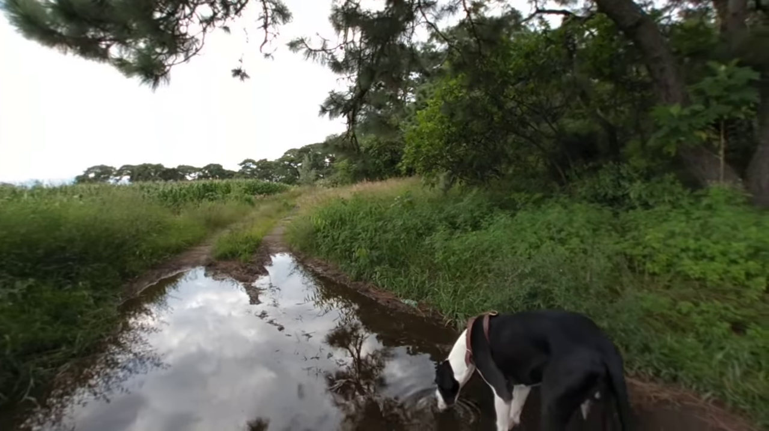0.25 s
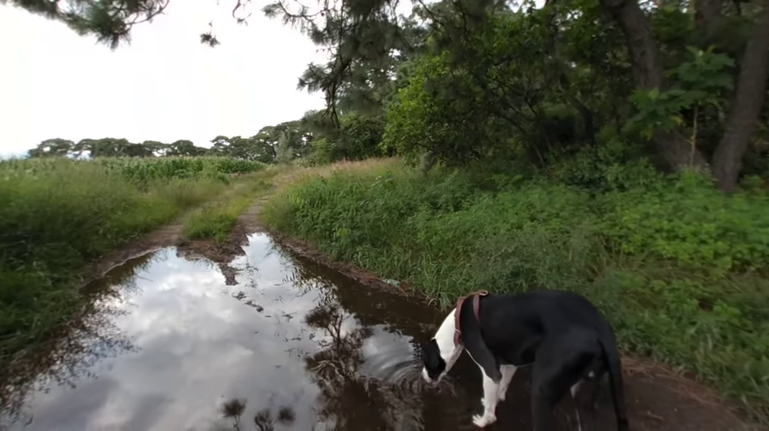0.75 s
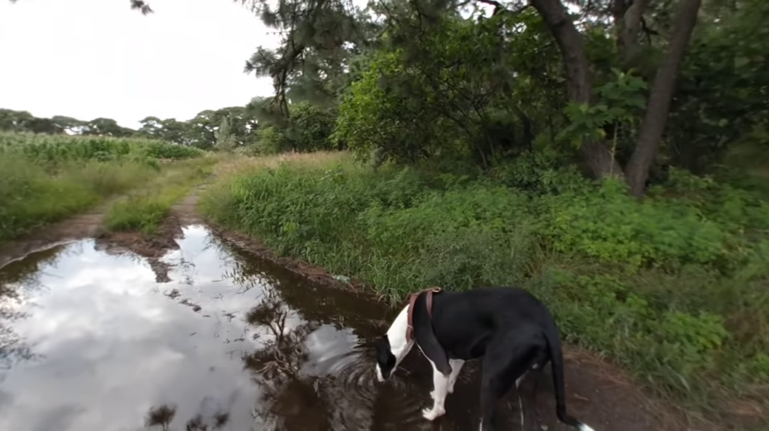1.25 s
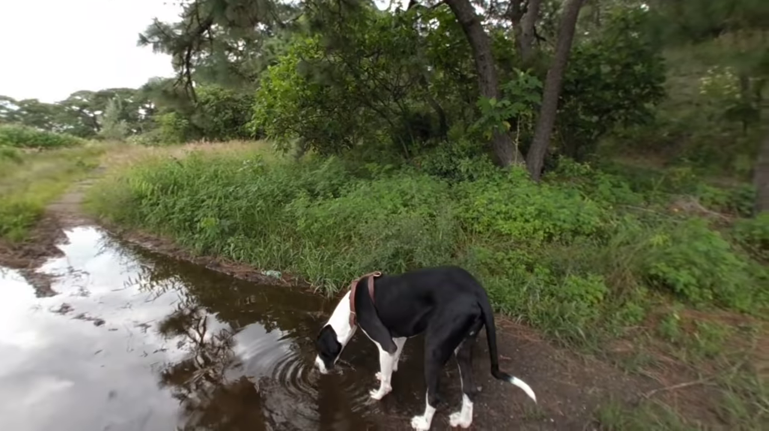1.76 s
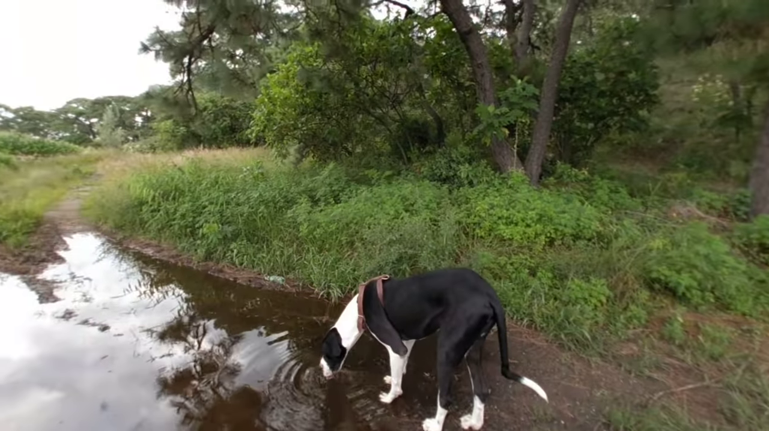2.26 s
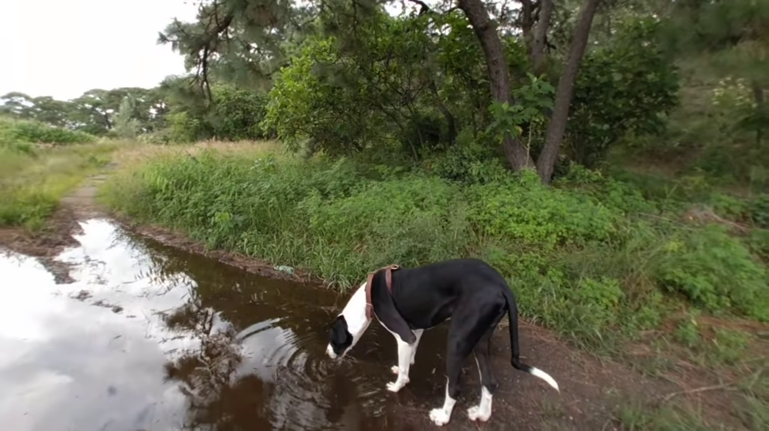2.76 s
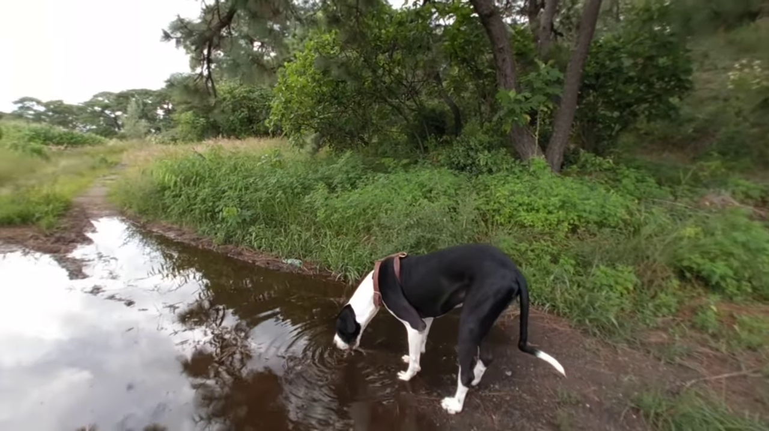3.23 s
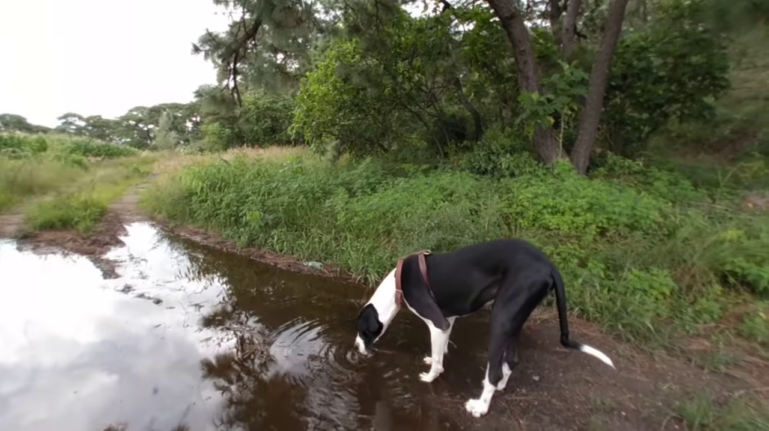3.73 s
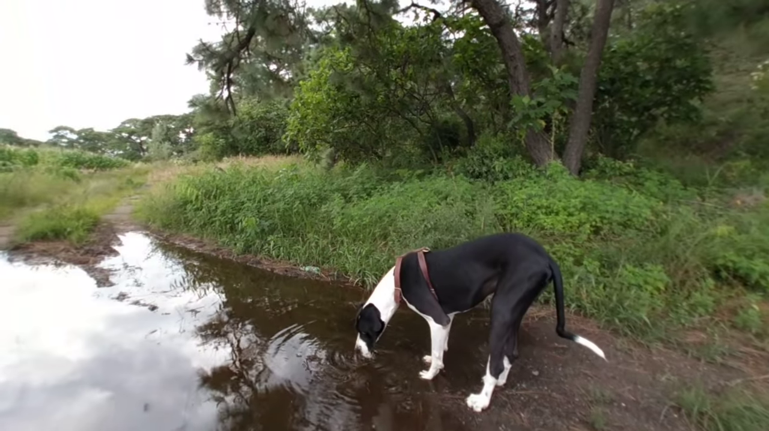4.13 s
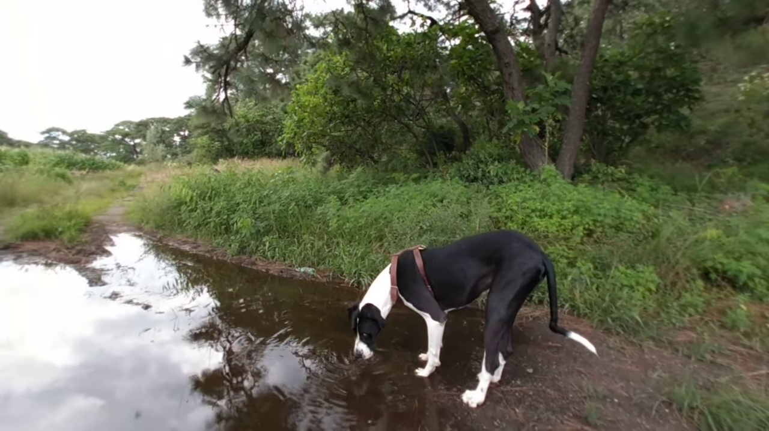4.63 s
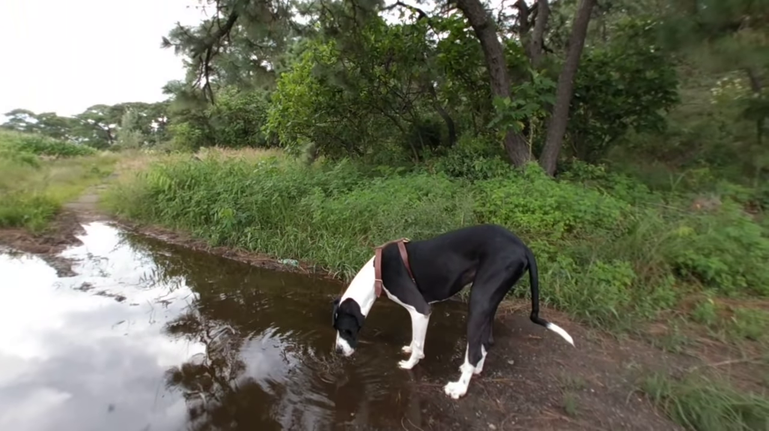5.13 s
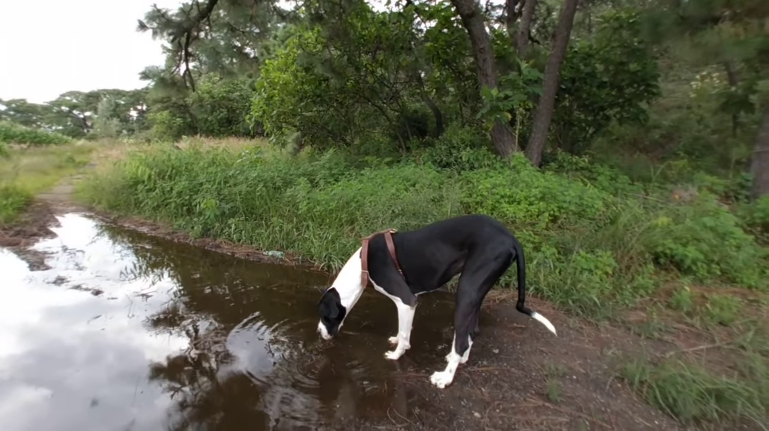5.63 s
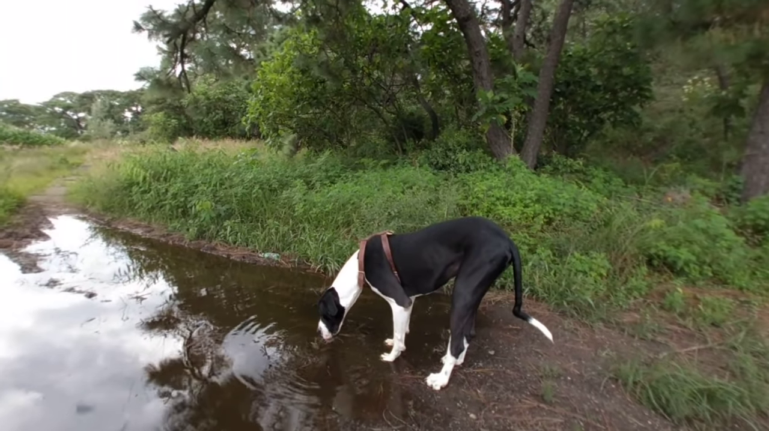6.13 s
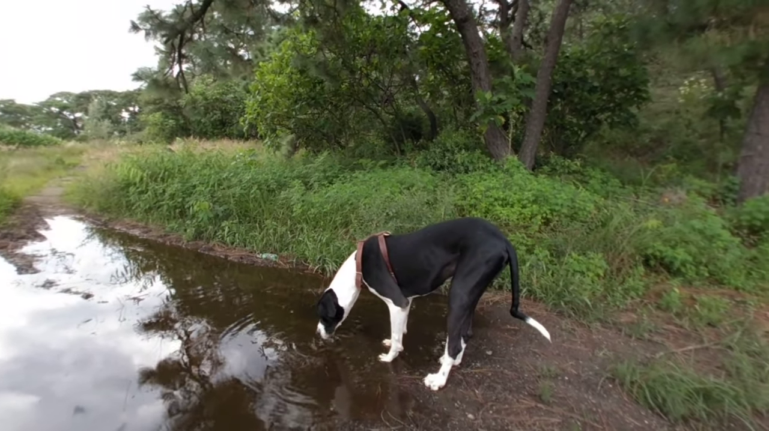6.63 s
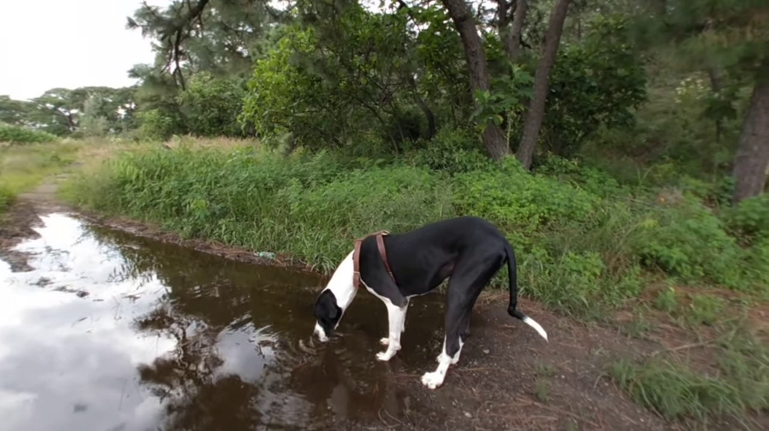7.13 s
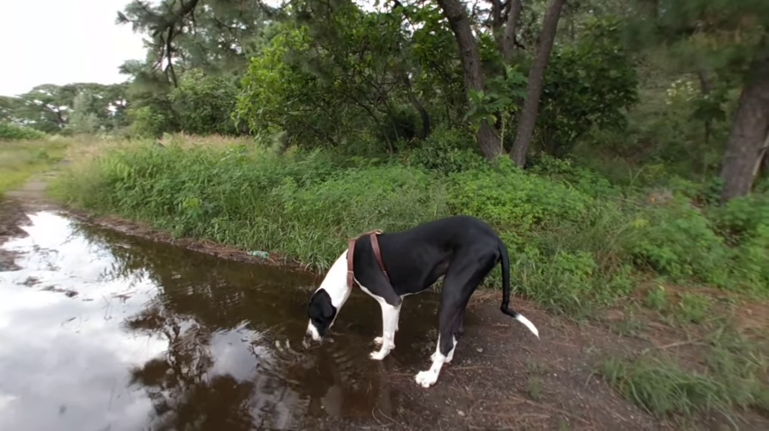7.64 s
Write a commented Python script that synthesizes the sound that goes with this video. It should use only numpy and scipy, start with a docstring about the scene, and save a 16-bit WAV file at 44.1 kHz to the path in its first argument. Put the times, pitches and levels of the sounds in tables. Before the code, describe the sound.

A dog's tongue slaps and stirs shallow water: smack, plop, gurgle, then small blips and crisp drips. The laps start sparse, grow strongest around two to three seconds, and continue in steady uneven bursts until the end. Faint bright rustling, as of clothing or grass, comes and goes over a soft low outdoor murmur with slight wind buffeting. Close, clean stereo pickup with almost no echo, only faint scatter from bank and bushes.

```python
"""A dog laps from a rain puddle on a dirt track: air pockets plop as damped resonators under its tongue,
wet surfaces smack and squelch by exciting small cavities, and bubbles, blips and drops ring at their own pitch.
The stirring of each lap drives a bubbly slurp and a fine spray of clicks. Around it lie a soft rustle, as of
clothing or grass, a low outdoor murmur with a gurgle in it, and gusts, all three made from shaped noise.
Faint scatter, a scattering recorder body, a wind filter, noise suppression and a band limit shape the whole."""
import sys
import numpy as np
from scipy import signal
from scipy.fft import rfft, irfft
from scipy.io import wavfile
from scipy.ndimage import uniform_filter1d

SR = 44100
rng = np.random.default_rng(int(sys.argv[2]) if len(sys.argv) > 2 else 0)


def transcribe(signal):
    """Save signal, clipped to [-1, 1], as a 16-bit WAV file at the path in sys.argv[1]."""
    frames = np.atleast_2d(signal).T
    limited = np.clip(frames, -1, 1)
    pcm = np.round(limited * 32767).astype(np.int16)
    wavfile.write(sys.argv[1], SR, pcm)


N = 347508
TIME = np.arange(N) / SR  # seconds
BRIEF = TIME[:3000]  # time axis of a single short event
EDGE_HZ = 16100  # upper band limit

# Levels in the tables are nominal: each layer may trim them. Pitches are nominal: most events bend around them.
# Air pockets that the tongue closes in the water. Each row: start in seconds, level in dB, pitch in Hz.
AIR_POCKETS = [(0.6614, -28.5, 220), (1.026, -43.5, 189), (1.399, -42, 159), (1.867, -46, 510),
               (2.2314, -36, 602), (2.293, -25.5, 188), (2.3579, -35, 431), (2.5518, -35, 470),
               (2.6673, -25.5, 182), (2.834, -41.5, 259), (2.9486, -26.5, 490), (3.054, -30, 182),
               (3.594, -42, 477), (3.851, -39, 430), (3.957, -39.5, 203), (3.975, -41, 406),
               (4.073, -41.5, 276), (4.117, -41.5, 480), (4.221, -40, 478), (4.333, -38.5, 280),
               (4.657, -43.5, 436), (4.7437, -32, 194), (4.789, -37.5, 266), (5.052, -40, 480),
               (5.069, -39, 361), (5.179, -36.5, 188), (5.238, -35.5, 506), (5.395, -39.5, 305),
               (5.653, -40.5, 430), (5.674, -38, 322), (5.929, -39, 335), (6.052, -42.5, 420),
               (6.198, -39.5, 511), (6.508, -42.5, 445), (6.583, -42.5, 460), (6.786, -37.5, 474),
               (6.805, -44, 465), (6.894, -39, 166), (7.279, -32.5, 183.6), (7.703, -41.5, 446)]
# Wet smacks of tongue and lips. Each row: start in seconds, level in dB, cavity pitch in Hz, overtone level in dB.
WET_SMACKS = [(0.3428, -36, 1020, -43), (0.4796, -31.5, 1420, -43), (0.484, -39, 850, -30),
              (0.573, -34.5, 1460, -55), (0.6061, -32, 697, -41), (0.9733, -32, 730, -28.5),
              (1.0825, -30.5, 715, -45), (1.459, -38.5, 776, -35), (1.9865, -39.5, 615, -40.5),
              (2.2, -52, 1220, -33), (2.2329, -31, 615, -38), (2.354, -50, 835, -30.5),
              (2.363, -29.5, 1350, -61), (2.3725, -34.5, 900, -37), (2.545, -40.5, 1030, -40.5),
              (3.0548, -32, 600, -46), (3.1112, -29, 1400, -46), (3.136, -36, 1090, -20),
              (4.018, -30, 900, -36), (4.054, -38.5, 925, -44), (4.2213, -58, 1094, -29),
              (4.393, -36.5, 920, -46), (4.4, -37, 1270, -56), (4.809, -34.5, 620, -47),
              (5.0544, -42.5, 620, -50), (5.679, -43, 1015, -43), (5.8322, -30, 1280, -63),
              (5.8378, -30, 870, -56), (5.932, -34.5, 845, -36), (6.0628, -36, 1650, -52.5),
              (6.2108, -46, 1090, -34.5), (6.5858, -35, 824, -35.5), (6.598, -39.5, 1160, -33),
              (6.953, -30.5, 864, -34), (6.9678, -31, 1350, -39.5), (7.1948, -38, 1110, -30),
              (7.3478, -30, 812, -36)]
# Loudest drops and bursting films. Each row: start in seconds, level in dB, pitch in Hz.
LOUD_DROPS = [(0.5727, -41, 14900), (0.6123, -40.5, 3300), (0.941, -36, 5730), (1.041, -39, 14400),
              (1.3496, -40, 3610), (2.199, -40, 5630), (2.756, -43, 14600), (2.834, -44.5, 12800),
              (3.0208, -40, 6770), (3.1117, -38, 3850), (3.168, -44, 3424), (3.9022, -38.5, 4500),
              (4.053, -32.5, 13000), (4.2996, -39.5, 7400), (4.716, -36, 14200), (4.7964, -37, 12000),
              (4.862, -44.5, 13500), (4.969, -50.5, 8450), (5.079, -44, 4700), (5.373, -42.5, 14000),
              (5.386, -43, 3200), (5.837, -43, 7160), (5.8845, -47.5, 8400), (5.9316, -52, 3950),
              (6.063, -47, 13300), (6.164, -50, 7260), (6.445, -45.5, 7700), (6.6003, -45, 3424),
              (6.8205, -44.5, 5570), (7.228, -42, 3800), (7.2391, -40.5, 6400), (7.324, -41, 6950),
              (7.7038, -46.5, 6850), (7.751, -45, 3940)]
# Single round bubbles that blip at the surface. Each row: start in seconds, level in dB, pitch in Hz.
SURFACE_BUBBLES = [(0.129, -50.5, 1760), (0.138, -51.5, 2760), (0.245, -47.5, 2410), (0.409, -56, 1420),
                   (0.939, -47, 1470), (0.962, -42.5, 1820), (1.279, -46, 1970), (1.829, -49, 2120),
                   (1.869, -48.5, 2360), (1.957, -52, 1620), (1.992, -38.5, 1020), (2.077, -41, 1340),
                   (2.176, -51, 2580), (2.24, -41.5, 1600), (2.449, -47, 1610), (2.7342, -39, 1315),
                   (2.746, -51, 2400), (3.65, -46, 2390), (3.666, -34.5, 2360), (4.034, -45.5, 2000),
                   (4.282, -45.5, 1470), (4.289, -41.5, 2480), (4.623, -48.5, 2370), (4.639, -44, 2080),
                   (4.794, -47, 1300), (4.862, -45.5, 2020), (4.871, -46.5, 2390), (5.13, -44.5, 1610),
                   (5.1398, -44, 2550), (5.221, -48, 1870), (6.284, -53, 2080), (6.659, -42, 1960),
                   (7.109, -52, 3025), (7.729, -51, 2560), (7.867, -47.5, 1680)]
# Water squeezed between tongue and palate, through a cavity that changes size. Each row: start in seconds,
# length in seconds, level in dB, first pitch in Hz, last pitch in Hz, overtone level in dB.
SQUEEZES = [(0.33, 0.021, -44.5, 1005, 800, -47.5), (0.883, 0.055, -46, 608, 447, -63),
            (1.06, 0.029, -51, 608, 915, -45.5), (1.082, 0.018, -44, 847, 1156, -47),
            (1.417, 0.027, -45.5, 406, 830, -68), (3.621, 0.061, -48, 730, 991, -75),
            (5.645, 0.0385, -56, 795, 1030, -65), (5.831, 0.013, -35, 1578, 1120, -80),
            (6.195, 0.017, -47.5, 583, 1150, -57), (7.313, 0.031, -43, 758, 1300, -43.5)]
# Laps, in which the tongue stirs the water. Each row: start in seconds, length in seconds, strength in dB.
TONGUE_LAPS = [(0.109, 0.17, -63), (0.318, 0.097, -57), (0.705, 0.0067, -44.5), (0.882, 0.23, -57),
               (1.144, 0.32, -57), (1.348, 0.16, -56), (1.816, 0.09, -57), (1.974, 0.12, -56.5),
               (2.172, 0.33, -53.5), (2.547, 0.075, -55), (2.714, 0.034, -49), (2.945, 0.24, -57),
               (3.473, 0.019, -47.5), (3.63, 0.3, -55), (3.843, 0.25, -54.5), (4.384, 0.046, -53),
               (4.625, 0.26, -56.5), (5.066, 0.051, -55.5), (5.221, 0.053, -53.5), (5.456, 0.012, -58),
               (5.645, 0.073, -55.5), (6.055, 0.009, -55.5), (6.272, 0.083, -66.5), (6.424, 0.29, -56),
               (6.785, 0.33, -58.5), (7.16, 0.2, -58), (7.661, 0.077, -57)]
# Gusts over the microphone ports. Each row: time of the peak in seconds, level in dB.
WIND_GUSTS = [(0.69, -46.5), (2.368, -39), (2.85, -50)]
# Loudness of the rustle. Each row: time in seconds, level in dB.
RUSTLE_LEVEL = [(0.13, -79), (0.24, -58.5), (0.87, -72), (1.02, -59.5), (1.48, -55), (1.78, -78.5),
                (2.2, -61.5), (2.5, -80), (2.6, -60), (2.92, -72.5), (3.17, -50.5), (3.55, -63.5),
                (3.92, -54), (4.15, -60.5), (4.6, -60), (5.28, -66.5), (5.34, -87), (5.39, -66),
                (5.54, -72), (6.35, -78.5), (6.97, -71), (7.12, -85), (7.34, -61), (7.42, -84)]
# Loudness of the low murmur. Each row: time in seconds, level in dB.
MURMUR_LEVEL = [(0, -56), (0.1, -78.5), (0.33, -57.5), (0.55, -64), (0.88, -57), (1.76, -60.5), (1.85, -55),
                (4.8, -54.5), (5.34, -54.5), (5.65, -53.5), (6.9, -53.5), (7.1, -61), (7.3, -50.5),
                (7.47, -66), (7.58, -56.5)]
# Spectral shapes of the five noise-like layers. Each row: frequency in Hz, relative spectral level in dB.
BUBBLE_SPECTRUM = [(250, -6), (480, 7), (750, -1), (1050, -4), (1400, -2), (2400, -6.5), (3100, -16.5),
                   (6000, -16.5), (10000, -30)]
SPRAY_SPECTRUM = [(1200, -10.5), (3000, -9.5), (10000, -22), (15500, -34)]
RUSTLE_SPECTRUM = [(500, 0.5), (1500, 11), (3000, 8.5), (6000, 6.5), (9000, 5.5), (12500, 8.5), (15500, 10)]
MURMUR_SPECTRUM = [(45, -16.5), (80, 5), (160, 6.5), (270, 0), (350, -5), (470, -0.5), (600, -9),
                   (900, -55), (1500, -61.5)]
BREEZE_SPECTRUM = [(30, -52), (70, -1), (200, -13.5), (600, -47)]
# Level under which the recorder takes sound for noise. Each row: frequency in Hz, level in dB per bin.
QUIET_LEVEL = [(100, -71.5), (450, -75), (1000, -103.5), (2000, -106), (5000, -99), (14000, -99)]

# the water is churned up fast, eases while the tongue works, and settles after it
CHURN_DB_PER_S, EASE_DB_PER_S, SETTLE_DB_PER_S = 910, 24.5, 390
RIPPLE_DB, RIPPLE_DB_PER_S = -12.5, 87  # ripples linger after a lap, relative to its strength
FROTH_DB, FROTH_DB_PER_S = -17.5, 649  # each smack leaves a brief froth, relative to its level
STILL_DB, HARDEST_DB = -81.5, -52  # stirring left in the pauses; the stirring never rises above a fixed ceiling
SWELL_S = 0.0044  # time an air pocket takes to reach its peak
GUST_DB_PER_S, CALM_DB = 165, -66.5  # how fast a gust comes and goes; the air between gusts


def gain_of(db):
    """Logarithmic level: decibels become an amplitude factor."""
    return 10 ** (np.asarray(db) / 20)


def evened(x):
    """Normalization of power: scales a signal to an rms of 1."""
    return x / np.sqrt(np.mean(x ** 2) + 1e-20)


def read_spectrum(points, hz):
    """Interpolation of a spectrum, linear in dB over log frequency."""
    f, value = np.transpose(points)
    return np.interp(np.log(hz + 1), np.log(f + 1), value)


def follow(curve):
    """Linear interpolation of a level curve at every sample."""
    return np.interp(TIME, *np.transpose(curve))


def add(mix, s, sound):
    """Superposition: adds a sound to the mix from time s onward."""
    part = mix[max(round(s * SR), 0):][:len(sound)]
    part += sound[:len(part)]


def coloured(x, colour):
    """Spectral shaping: weights each frequency, then scales to an rms of 1."""
    weights = gain_of(read_spectrum(colour, np.fft.rfftfreq(N, 1 / SR)))
    return evened(irfft(rfft(x) * weights, N))


def wander(count):
    """Slow random modulation: noise smoothed twice over count samples, at an rms of 1."""
    smooth = uniform_filter1d(rng.standard_normal(N), count)
    return evened(uniform_filter1d(smooth, count))


def clicks(per_s, spread_db):
    """Random impulses of either sign: most are small and a few large."""
    size = gain_of(spread_db * np.minimum(rng.exponential(1, N), 3.5))
    sign = rng.choice([-1, 1], N)
    return size * sign * (rng.random(N) < per_s / SR)


def ring(hz, cycles):
    """Damped resonance: a cavity decays by 1/e in some cycles, its pitch rising as it shrinks."""
    age = BRIEF * hz / cycles
    turns = np.cumsum(hz * (1 + .03 * np.tanh((age - 1) / 2))) / SR
    return np.exp(-age) * np.sin(2 * np.pi * turns)


def snap(decay):
    """Broadband transient: the short crack of wet surfaces that meet or part."""
    band = signal.butter(1, [700, 3200], "band", fs=SR)
    burst = signal.lfilter(*band, rng.standard_normal(len(BRIEF)))
    return evened(burst) * np.exp(-BRIEF / decay)


def crackle(length, per_s):
    """Decaying impulse train: a few small clicks as a water film tears."""
    lot, size = rng.random(len(BRIEF)), rng.standard_normal(len(BRIEF))
    return (lot < per_s / SR) * size * np.exp(-BRIEF / length)


def wavering(t, hz, rough, count=60):
    """Frequency modulation: a unit tone whose pitch wavers as its cavity trembles."""
    tremble = evened(uniform_filter1d(rng.standard_normal(len(BRIEF)), count))[:len(t)]
    return np.sin(2 * np.pi * np.cumsum(hz * (1 + rough * tremble)) / SR)


def swell(start, length, db, rise, sag, fall):
    """Exponential power envelope: attack, sagging hold and release, each in dB per second."""
    age = TIME - start
    before, after = np.maximum(-age, 0), np.maximum(age - length, 0)
    drop = rise * before + sag * np.clip(age, 0, length) + fall * after
    return gain_of(db - np.minimum(drop, 100)) ** 2


def swarm(births, low_hz, high_hz):
    """Superposed bubble resonances of many sizes: some ring on while others soon die."""
    out = np.zeros(N)
    pitch = low_hz * (high_hz / low_hz) ** rng.random(N)
    cycles = 2 * 4 ** rng.random(N)
    for at in np.flatnonzero(births):
        onset = 1 - np.exp(-BRIEF * pitch[at])  # swells within about a cycle
        bubble = ring(pitch[at], cycles[at]) * onset
        add(out, at / SR, births[at] * pitch[at] / np.sqrt(cycles[at]) * bubble)
    return out


def stirring():
    """Addition of powers, in dB: laps churn the water and leave ripples, and smacks add froth."""
    power = np.full(N, gain_of(STILL_DB) ** 2)
    for start, length, db in TONGUE_LAPS:
        power += swell(start, length, db, CHURN_DB_PER_S, EASE_DB_PER_S, SETTLE_DB_PER_S)
        power += swell(start, length, db + RIPPLE_DB, CHURN_DB_PER_S, EASE_DB_PER_S, RIPPLE_DB_PER_S)
    for s, db, _, overtone_db in WET_SMACKS:
        froth_db = max(db, overtone_db) + FROTH_DB - FROTH_DB_PER_S * BRIEF
        add(power, s, gain_of(froth_db) ** 2)
    return np.minimum(10 * np.log10(power), HARDEST_DB)


def murmur(level_db=-1, swell_db=2.0, slosh_db=-6):
    """Shaped noise: low outdoor air, with low bubble resonances as the gurgle of the rocking puddle."""
    noise = coloured(rng.standard_normal(N), MURMUR_SPECTRUM)
    air = noise * gain_of(level_db + swell_db * wander(count=1800))
    slosh = evened(swarm(clicks(per_s=35, spread_db=0.0), 135.7, 498.0))
    return (air + gain_of(slosh_db) * slosh) * gain_of(follow(MURMUR_LEVEL))


def breeze(level_db=1):
    """Incoherent turbulence: moving air buffets each microphone port on its own."""
    power = gain_of(CALM_DB) ** 2
    for s, db in WIND_GUSTS:
        power = power + swell(s, 0, db, GUST_DB_PER_S, 0, GUST_DB_PER_S)
    noise = coloured(rng.standard_normal((2, N)), BREEZE_SPECTRUM)
    return noise * gain_of(level_db) * np.sqrt(power)


def rustle(level_db=1, flutter_db=3.0):
    """Friction noise: a fine, bright rubbing hiss, independent in each channel."""
    hiss = coloured(rng.standard_normal((2, N)), RUSTLE_SPECTRUM)
    return hiss * gain_of(follow(RUSTLE_LEVEL) + level_db + flutter_db * wander(count=900))


def bubbles(level_db=-0.5, spread_db=3.5):
    """Density of resonators: gentle stirring frees sparse bubbles, hard stirring packs a ragged slurp."""
    stir = stirring()
    per_s = 900 * gain_of(stir - stir.max()) + 220
    births = clicks(per_s, spread_db) / np.sqrt(per_s)  # evens out power as the density changes
    chatter = coloured(evened(swarm(births, 420, 3400)), BUBBLE_SPECTRUM)
    # bubbles too small to tell apart fuse into a wash between the others
    wash = coloured(rng.standard_normal(N), BUBBLE_SPECTRUM)
    clumps_db = 3 * wander(count=350)
    return evened(chatter + .55 * wash) * gain_of(stir + level_db + clumps_db)


def spray(level_db=-11.0, per_s=330, spread_db=5, clump_db=3, steepness=1.36):
    """Nonlinear drive: the finest droplets tick in clumps, rising more steeply than the stirring."""
    fizz = clicks(per_s, spread_db) * gain_of(clump_db * wander(count=500))
    stir = stirring()
    drive = stir.mean() + steepness * (stir - stir.mean())
    mist = evened(swarm(fizz, 3000, 14000)) + evened(fizz)
    return coloured(mist, SPRAY_SPECTRUM) * gain_of(drive + level_db)


def blips(level_db=0, swell_s=.0018, bend=.03, rough=.025, snap_db=-13):
    """Bubble resonance: a film snaps at the surface, and the tone swells and bends upward in pitch."""
    out, age = np.zeros(N), BRIEF / swell_s
    for s, db, hz in SURFACE_BUBBLES:
        pitch = hz * (1 + bend * np.tanh((age - 2) / 2))
        tone = age * np.exp(1 - age) * wavering(BRIEF, pitch, rough)
        add(out, s, gain_of(db + level_db) * (tone + gain_of(snap_db) * snap(decay=2 * swell_s)))
    return out


def squelches(level_db=-1, overtone=2.15, rough=0.14, overtone_rough=0.1):
    """Sustained cavity resonance: squeezed water sounds two modes that glide as the tongue moves."""
    out = np.zeros(N)
    for s, length, db, first_hz, last_hz, overtone_db in SQUEEZES:
        t = BRIEF[BRIEF < length]
        hz = first_hz * (last_hz / first_hz) ** (t / length)
        tone = gain_of(db) * wavering(t, hz, rough)
        tone = tone + gain_of(overtone_db) * wavering(t, hz * overtone, overtone_rough)
        add(out, s, gain_of(level_db) * np.sin(np.pi * t / length) * tone)
    return out


def smacks(level_db=-0.5, cycles=2.14, overtone=2.09, snap_db=-21, peel=0.0056):
    """Impulse excitation by convolution: peeling surfaces ring a cavity and its overtone, click by click."""
    out = np.zeros(N)
    onset = 1 - np.exp(-BRIEF / .00025)
    for s, db, hz, overtone_db in WET_SMACKS:
        before = .14 * crackle(length=peel, per_s=900)[::-1]  # reversed: builds up to the main click
        push = np.concatenate([before, [1], .22 * crackle(length=0.007, per_s=600)])
        cavity = gain_of(db) * ring(hz, cycles) + gain_of(overtone_db) * ring(hz * overtone, cycles)
        wet = signal.fftconvolve(push, cavity * onset)
        add(out, s - len(before) / SR, gain_of(level_db) * wet)
        add(out, s, gain_of(max(db, overtone_db) + snap_db) * snap(decay=0.0015))
    return out


def drops(ping_db=-1, cycles=7, splat_db=-6, splat=0.0033, fizz_db=-29):
    """Impact noise and bubble resonance: a splat, brighter if small, a tiny ring and a froth that fizzes on."""
    out, age = np.zeros(N), TIME[:SR // 4]
    fade = gain_of(splat_db) * np.exp(-age / splat) + gain_of(fizz_db) * np.exp(-(age / .055) ** 2)
    for s, db, hz in LOUD_DROPS:
        band = signal.butter(2, [2500, min(2 * hz + 2500, EDGE_HZ)], "band", fs=SR)
        burst = signal.lfilter(*band, rng.standard_normal(len(age)))
        add(out, s, gain_of(db) * burst * fade)
        add(out, s, gain_of(db + ping_db) * ring(hz, cycles))
    return out


def plops(level_db=0, sag=0.035, tail_db=-22, tail=0.041, slap_db=-12):
    """Air-pocket resonance: after the tongue's slap the pocket swells, sags in pitch and dies."""
    out, age = np.zeros(N), BRIEF / SWELL_S
    body = (age * np.exp(1 - age)) ** 2
    shape = body + gain_of(tail_db) * (1 - np.exp(-age)) * np.exp(-BRIEF / tail)
    for s, db, hz in AIR_POCKETS:
        turns = np.cumsum(hz * (1 + sag * (np.exp(-age / 2) - .5))) / SR
        # larger, deeper pockets come from harder slaps
        slap = gain_of(slap_db) * 180 / hz * (ring(650, 2) + snap(decay=.001) / 2)
        add(out, s, gain_of(db + level_db) * (slap - shape * np.sin(2 * np.pi * turns)))
    return out


def ports(x, side_db=-1, corner_hz=6500, scatter=0.00054):
    """Diffraction: the recorder's body scatters short waves differently into two ports; the bass is mono."""
    path = rng.standard_normal(len(BRIEF)) * np.exp(-BRIEF / scatter)
    side = signal.oaconvolve(x, path / np.linalg.norm(path))[:N]
    high = signal.butter(2, corner_hz, "high", fs=SR)
    side = gain_of(side_db) * signal.lfilter(*high, side)
    return np.array([x + side, x - side])


def bank(x):
    """Diffuse reflection: a faint, short scatter off the bank and the bushes, different on each side."""
    taps = rng.standard_normal((2, len(BRIEF))) * np.exp(-BRIEF / .014) * (BRIEF > .005)
    taps = taps / np.linalg.norm(taps[0])
    return gain_of(-16) * signal.oaconvolve(x[None], taps, axes=1)[:, :N]


def scene():
    """Superposition of the lapping, its faint scatter and the surroundings."""
    water = plops() + smacks() + squelches() + blips() + drops() + bubbles() + spray()
    return ports(water) + bank(water) + rustle() + murmur() + breeze()


def suppress(x, depth=1.0):
    """Spectral gain: turns down every patch of the spectrum near or under the quiet level."""
    hz, _, z = signal.stft(x, SR, nperseg=512, noverlap=384)
    power = (abs(z) ** 2).mean(0)  # shared by both channels
    power = uniform_filter1d(uniform_filter1d(power, size=3, axis=0), size=3, axis=1)
    power = abs(power) + 1e-20
    quiet = gain_of(read_spectrum(QUIET_LEVEL, hz))[:, None] ** 2
    keep = (power / (power + quiet)) ** depth
    return signal.istft(z * keep, SR, nperseg=512, noverlap=384)[1][:, :N]


def record(dry):
    """Linear filtering around a spectral gain: wind filter, noise suppression and band limit."""
    wind_filter = signal.butter(2, 55, "high", fs=SR)
    clean = suppress(signal.lfilter(*wind_filter, dry))
    band_limit = signal.firwin(511, EDGE_HZ, window=("kaiser", 9), fs=SR)
    return signal.oaconvolve(clean, band_limit[None], "same")


dry = scene()
out = record(dry)
transcribe(out)
```